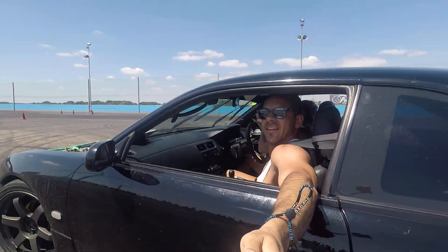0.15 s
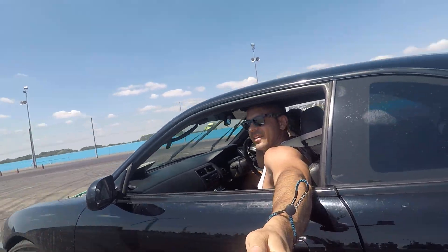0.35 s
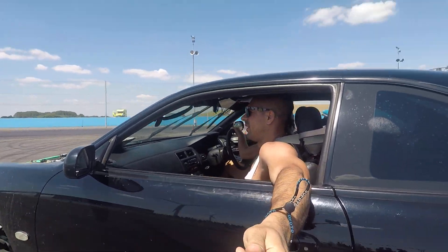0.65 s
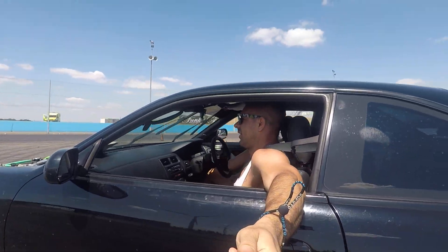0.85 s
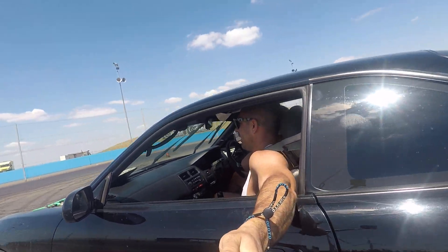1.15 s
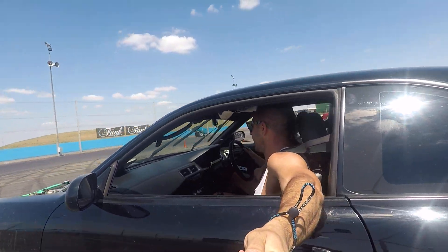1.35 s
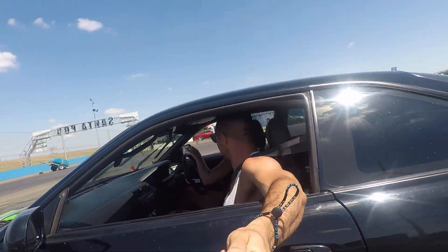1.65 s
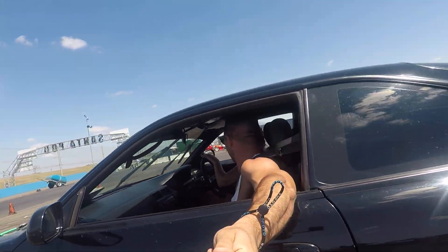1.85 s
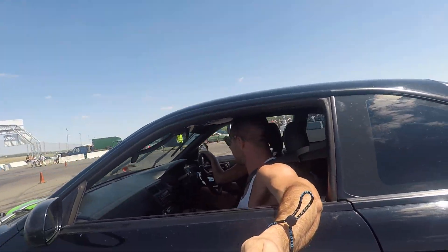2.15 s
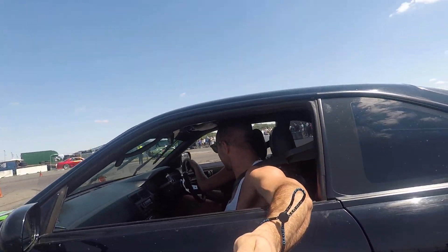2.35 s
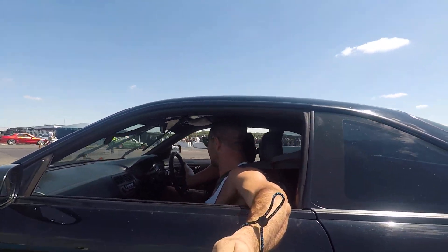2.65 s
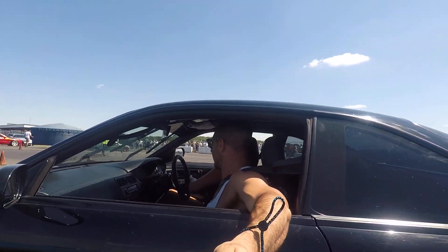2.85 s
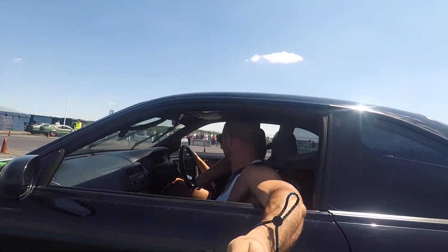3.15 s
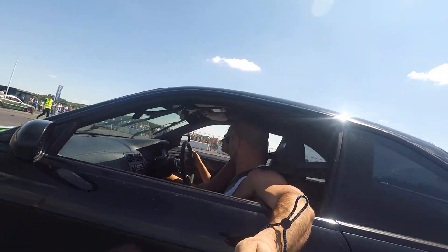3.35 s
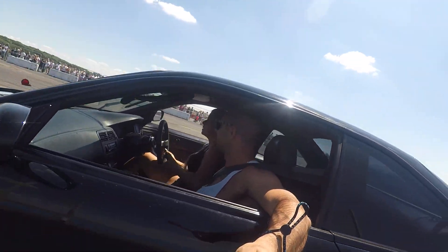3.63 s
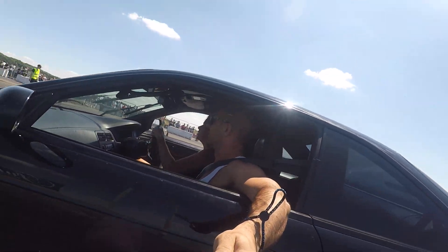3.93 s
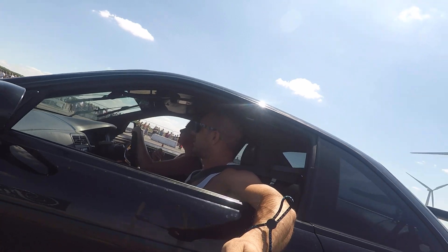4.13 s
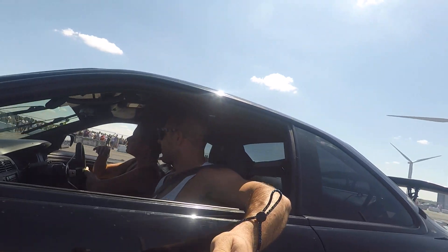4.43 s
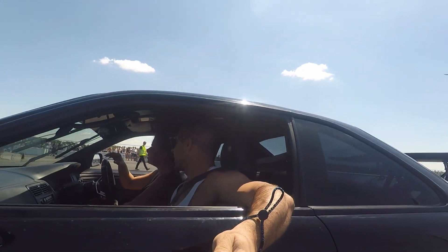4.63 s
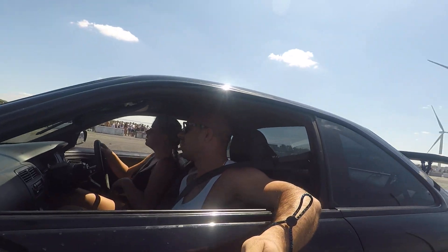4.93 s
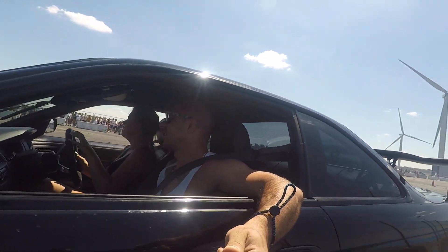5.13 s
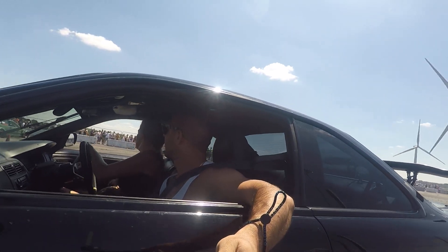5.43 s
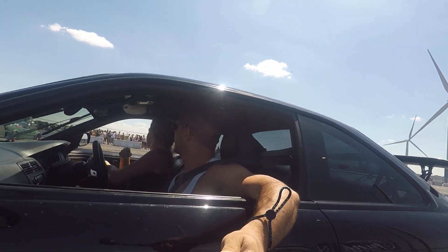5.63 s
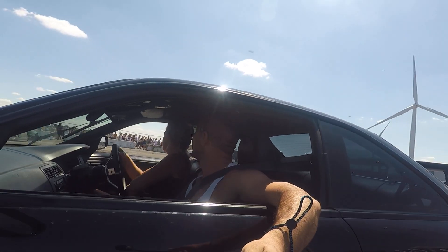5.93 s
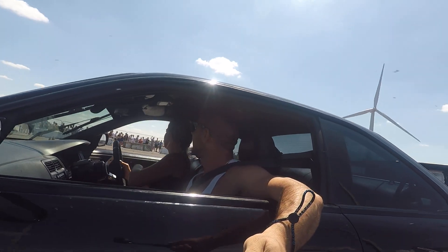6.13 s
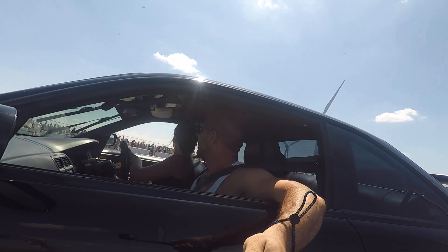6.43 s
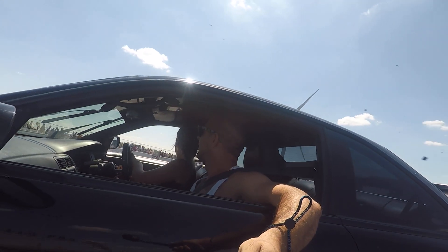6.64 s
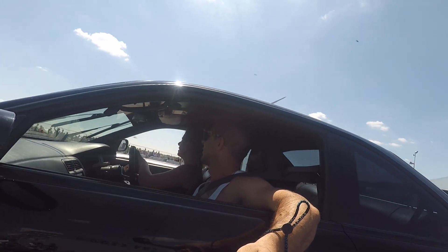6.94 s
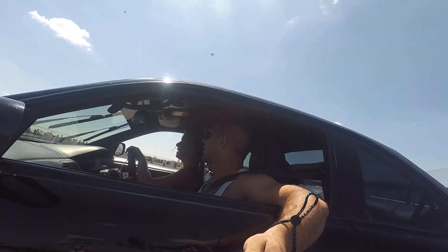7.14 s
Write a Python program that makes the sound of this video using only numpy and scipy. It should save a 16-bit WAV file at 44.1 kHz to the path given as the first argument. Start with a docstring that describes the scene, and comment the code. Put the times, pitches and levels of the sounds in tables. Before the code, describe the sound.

A car drifts on asphalt, heard close up from beside its open window. The tyres hold one high, rough screech while the four-cylinder engine revs up and down, then stays high. After about four seconds the tyres grip and the screech stops. The exhaust boom sinks with a faint gear whine and a brake chirp. A loose panel taps as rushing wind and low rumble build.

```python
"""Tyres screech for four seconds over a revving engine: a four-cylinder car drifts, heard at the window.
The tread sticks and slips on the asphalt, then grips. The exhaust booms at the firing rate as the revs
sink, gears whine, the turbo vents, a brake disc chirps and a loose panel rattles.
Rushing air and a low rumble build as the car pulls away."""
import sys
import numpy as np
from scipy import signal
from scipy.fft import rfft, irfft, next_fast_len
from scipy.io import wavfile
from scipy.ndimage import uniform_filter1d, minimum_filter1d

SR = 44100
rng = np.random.default_rng(int(sys.argv[2]) if len(sys.argv) > 2 else 0)


def digitize_waveform(pressure):
    """Quantize a signal to 16-bit integers and store it at the path in sys.argv[1].

    Rows of a 2-D input are taken as channels; values are limited to [-1, 1].
    """
    field = np.atleast_2d(pressure).T
    bounded = np.clip(field, -1, 1)
    quanta = np.round(bounded * 32767).astype(np.int16)
    wavfile.write(sys.argv[1], SR, quanta)


N = 321048
T_S = np.arange(N) / SR

# engine firing rate, also drives wheelspin: t/s, f/Hz
FIRING_HZ = [(0, 145.4), (.07, 144.3), (.22, 114), (.34, 128.7), (.52, 129.1), (.58, 116.7), (.85, 136.2),
             (1.21, 173.9), (1.42, 155.1), (1.7, 166.2), (1.9, 164.6), (2.05, 171.7), (3.52, 163.1),
             (3.62, 152.6), (3.88, 111.8), (4, 101.7), (4.17, 95), (4.42, 98.6), (4.7, 94.6), (5.35, 84.7),
             (5.75, 63), (6.42, 37.5), (6.9, 43.66), (7.28, 45.66)]
# pedal: t/s, opening/0-1
PEDAL = [(.1, 0.57), (.4, 0.95), (1.22, 0.99), (1.45, 0.7), (1.78, 0.5), (1.98, 0.32), (3.5, 0.1),
         (3.7, 0.04), (5.75, 0.25), (6, .3)]
# treble of the slide: t/s, relative level/dB
TREBLE_DB = [(0.06, -34.5), (0.48, -33), (0.53, -36.5), (1.32, -31.5), (1.35, -37.5), (1.72, -31.5),
             (1.83, -32.5), (3.29, -30), (3.85, -36)]
# low rumble level: t/s, relative level/dB
RUMBLE_DB = [(0, -1), (1.8, 2.5), (3.4, -1), (4.1, -7), (5.55, -6), (5.8, -1), (6.25, -2.5), (6.9, 2),
             (7.28, 8)]
TOP_HZ, GRIP_HZ = 170.2, 110.55   # firing rates at full wheelspin and near grip
SLIDE_START_S, BITE_S = 0.052, 0.27


def from_db(db):
    """Decibels to gain."""
    return 10 ** (np.asarray(db) / 20)


def unit_rms(x):
    """Scale to unit power."""
    return x / np.sqrt(np.mean(np.abs(x) ** 2) + 1e-20)


def curve(rows):
    """(t/s, value) points interpolated to every sample."""
    return np.interp(T_S, *np.transpose(rows))


def held(start_s, end_s, attack_s, release_s):
    """Unit gain from start to end; fade times outside are per 20 dB."""
    outside = np.maximum(start_s - T_S, 0) / attack_s + np.maximum(T_S - end_s, 0) / release_s
    return from_db(-20 * np.minimum(outside, 10))


def bump(centre_s, half_s):
    """Gaussian envelope, 1/e at +-half_s."""
    return np.exp(-((T_S - centre_s) / half_s) ** 2)


def butter(x, order, hz, kind="low"):
    """Butterworth filter."""
    return signal.sosfilt(signal.butter(order, hz, kind, fs=SR, output="sos"), x)


def coloured(x, spectrum):
    """Shape by (f/Hz, level/dB) points with 12 dB/oct skirts; unit power."""
    hz, db = np.transpose(spectrum)
    size = next_fast_len(N)
    bins_hz = np.maximum(np.fft.rfftfreq(size, 1 / SR), 1)
    skirts = np.minimum(1, np.minimum(bins_hz / hz[0], hz[-1] / bins_hz)) ** 2
    gain = from_db(np.interp(np.log(bins_hz), np.log(hz), db))
    return unit_rms(irfft(rfft(x, size) * skirts * gain, size)[:N])


def noise(spectrum):
    """Steady coloured noise; unit power."""
    return coloured(rng.standard_normal(N), spectrum)


def drift(hz):
    """Random motion up to hz; unit spread."""
    lowpass = signal.butter(2, min(hz, SR / 50), fs=SR / 20, output="sos")
    slow = signal.sosfilt(lowpass, rng.standard_normal(N // 20 + 2002))[2000:]
    return np.interp(np.arange(N) / 20, np.arange(len(slow)), unit_rms(slow))


def phase_of(hz):
    """Phase/rad of a moving frequency."""
    return 2 * np.pi * np.cumsum(hz) / SR


def ragged_tone(phase, width_hz):
    """Tone with wandering amplitude and phase; unit power."""
    return unit_rms(drift(width_hz / 2) * np.cos(phase) + drift(width_hz / 2) * np.sin(phase))


def squeaks(rows, waver, waver_hz):
    """Short friction tones that swell, glide and fade."""
    out = np.zeros(N)
    wobble = 1 + waver * drift(waver_hz)
    for start_s, length_s, first_hz, last_hz, db in rows:
        on = (T_S > start_s) & (T_S < start_s + length_s)
        progress = (T_S[on] - start_s) / length_s
        hz = (first_hz + (last_hz - first_hz) * progress) * wobble[on]
        out[on] += from_db(db) * np.sqrt(2) * np.sin(np.pi * progress) * np.sin(phase_of(hz))
    return out


def wheelspin():
    """Tread slip: 0 near grip, 1 at TOP_HZ."""
    return np.maximum(curve(FIRING_HZ) - GRIP_HZ, 0) / (TOP_HZ - GRIP_HZ)


def engine():
    """Four firings a cycle: boom at the firing rate, its octave, throb from unequal cylinders, growl."""
    # pedal lifts and stumbles that choke the boom: t/s, half width/s, depth/dB
    lifts = [(.53, 0.023, 15), (1.334, 0.096, 12), (4.506, 0.035, 3), (4.666, 0.0054, 13),
             (6.17, 0.072, 5.5), (6.42, 0.069, 8)]
    # exhaust boom, throttle shut: firing rate/Hz, level/dB
    shut_boom = [(40, -27.5), (52, -26), (66, -10), (76, -8.5), (100, -9.5), (130, -16), (170, -22.5)]
    knee_hz, open_db_per_oct = 88, 11.5   # open throttle carries the boom above the resonance
    lug_hz, lug_db_per_hz = 52.22, 1.7   # the octave takes over at low revs
    firing_hz, throttle = curve(FIRING_HZ), curve(PEDAL)
    revs_oct = np.log2(firing_hz / TOP_HZ)
    lift_db = sum(db * bump(at_s, half_s) for at_s, half_s, db in lifts)
    phase = phase_of(firing_hz * (1 + 0.0033 * drift(23.7)))
    boom_db = np.interp(firing_hz, *np.transpose(shut_boom))
    boom_db += open_db_per_oct * throttle * np.maximum(np.log2(firing_hz / knee_hz), 0)
    boom = from_db(boom_db - lift_db + (1 + wheelspin()) * drift(25)) * np.sin(phase)
    # lumpy firing at low revs: the silencer passes the orders beside the octave
    lumps = butter(ragged_tone(1.5 * phase, 7.9) + ragged_tone(3 * phase, 5), order=4, hz=140)
    lug_db = np.maximum(-13.5 - lug_db_per_hz * np.maximum(firing_hz - lug_hz, 0), -45.5)
    octave = from_db(lug_db - lift_db + drift(30)) * (np.sin(2 * phase) + from_db(-14) * lumps)
    throb_db = -22 + 46 * revs_oct + 2 * drift(21)
    throb = np.sin(phase / 2) + from_db(-5.5 + 2 * drift(5.9)) * np.sin(0.75 * phase)
    lows = np.sqrt(2) * (boom + octave + from_db(throb_db) * throb)
    return lows + exhaust_growl(phase, revs_oct, throttle, lift_db)


def exhaust_growl(phase, revs_oct, throttle, lift_db):
    """Upper orders rasp and bark: clean at high revs, puffs of gas at low revs and in a lift."""
    # pipe rasp spectrum: f/Hz, level/dB
    rasp = [(200, -23.5), (260, -12.5), (330, -14), (420, -8), (510, -7), (590, -2), (670, 0), (780, -5.5),
            (1200, -36.5)]
    # exhaust bark spectrum: f/Hz, level/dB
    bark = [(200, -2.5), (260, 1.5), (340, -20), (425, 1.5), (510, -2.5), (600, -8), (750, -30)]
    crank = phase / 2
    pulses = sum(from_db(-3 * (k % 2) + 2 * drift(13)) * np.sin(k * crank + rng.uniform(0, 2 * np.pi))
                 for k in range(3, 17))
    puffs = rng.standard_normal(N) * (1 + np.sin(crank)) ** 2
    puff_share = np.clip(0.1 - 0.36 * revs_oct + 0.06 * lift_db, 0, 1)
    rasp_db = np.maximum(-41 + 22.5 * revs_oct + 9.5 * throttle + 0.35 * lift_db, -52)
    bark_db = -27.5 + 61 * revs_oct - 30.5 * (1 - throttle)
    return sum(from_db(db) * (np.sqrt(1 - puff_share) * coloured(pulses, spectrum)
                              + np.sqrt(puff_share) * coloured(puffs, spectrum))
               for db, spectrum in [(rasp_db, rasp), (bark_db, bark)])


def tyre_squeal(judder):
    """Tread sticks and slips near 1 kHz; spin and throttle smear the note and its overtones."""
    # stick-slip rate: t/s, f/Hz
    slip_hz = [(0, 1088), (.045, 985), (.12, 991.8), (.3, 968), (.47, 1020), (.56, 946), (.64, 950.5),
               (.88, 1060), (1.17, 1098), (1.42, 1058), (1.88, 1063), (2.35, 1067), (2.66, 1094),
               (3.1, 1069), (3.3, 1044), (3.54, 1064), (3.8, 960), (4.05, 951)]
    # other tyres squealing near the note: pitch ratio, width/Hz, relative level/dB
    other_tyres = [(1, 84, -5), (1.105, 70, -8), (.89, 85, -14.5)]
    # harmonics from the second up: width/Hz, relative level/dB
    harmonics = [(280, 3.5), (219, -6.5), (330, -13)]
    # groans as a tyre bites: t/s, length/s, start f/Hz, end f/Hz, level/dB
    groans = [(.02, 0.048, 760, 700, -24), (.1, 0.054, 747, 714, -31.5), (.42, 0.08, 720, 705, -31),
              (.51, 0.057, 686, 713, -29), (3.51, 0.11, 760, 790, -26.5), (3.6, 0.097, 727, 670, -31),
              (3.7, 0.08, 731.5, 699, -31.5), (3.77, 0.12, 695, 643, -35.5)]
    end_s, release_s, lead_s = 4.0, 0.076, 0.071   # each higher harmonic ends lead_s sooner
    spin, throttle = wheelspin(), curve(PEDAL)
    ragged = 0.462 + 0.42 * spin + 0.26 * throttle
    jitter = 0.00898 * drift(18) + 0.00699 * drift(45) + 0.013 * drift(149)
    phase = phase_of(curve(slip_hz) * (1 + ragged * jitter))
    note = np.sqrt(2) * np.sin(phase) * from_db(drift(58))
    beside = sum(from_db(db) * ragged_tone(ratio * phase, width_hz) for ratio, width_hz, db in other_tyres)
    sliding = held(SLIDE_START_S, end_s, BITE_S, release_s)
    screech = sliding * (note + ragged * beside) / np.sqrt(1 + 0.5 * ragged ** 2)
    # slips are cleanest and sharpest at low wheelspin
    clean = np.maximum(1.05 - 0.87 * spin, 0)
    tilt_db = 2.5 - 2 * spin
    overtones = 0
    for k, (width_hz, db) in enumerate(harmonics, 2):
        gate = held(SLIDE_START_S, end_s - (k - 1) * lead_s, BITE_S, release_s)
        tone = ragged * ragged_tone(k * phase, width_hz) + clean * np.sin(k * phase)
        overtones += from_db(db + (k - 1) * tilt_db) * gate * tone
    swing_db = curve(TREBLE_DB) + 32
    overtones_db = -25 - 6.5 * spin - 1.5 * throttle + swing_db + 2 * judder
    squeal = from_db(-13) * screech + from_db(overtones_db) * overtones
    return squeal + squeaks(groans, waver=0.047, waver_hz=120)


def tyre_scrub(judder):
    """Rubber tears on the asphalt in grains until the slide ends."""
    # tearing spectrum: f/Hz, level/dB
    tearing = [(760, -9.5), (1300, 4), (1450, -3), (1750, -5), (2400, -3.5), (3100, -9.5), (3600, -10),
               (4300, -10), (5100, -18), (6800, -18), (8500, -30), (10000, -39.5), (11500, -50.5),
               (15000, -78)]
    sliding = held(SLIDE_START_S, end_s=3.8, attack_s=BITE_S, release_s=0.46)
    grain_db = 1.2 * judder + 0.7 * drift(27) + 1.2 * drift(190)
    return sliding * from_db(curve(TREBLE_DB) + 6.5 + grain_db) * noise(tearing)


def ground_dip(x, dip_hz, width_hz, depth):
    """The bounce off the asphalt cancels a band of the tyres' treble."""
    notched = signal.lfilter(*signal.iirnotch(dip_hz, dip_hz / width_hz, fs=SR), x)
    return x + depth * (notched - x)


def air_rush():
    """Air rushes past the microphone, beats on its housing and scuffs it in gusts."""
    # rush: t/s, relative level/dB
    rush_db = [(0, -58.5), (3.9, -51), (4.5, -49.5), (5.45, -49.5), (5.72, -53), (6.4, -47), (6.8, -42.5),
               (7.28, -43)]
    # rush spectrum: f/Hz, level/dB
    rush_spectrum = [(880, -24.5), (1500, -1), (2200, -6), (3200, -8), (4500, -10), (6300, -16),
                     (7200, -20), (10000, -32), (11500, -58), (15000, -78.5)]
    # housing flutter spectrum: f/Hz, level/dB
    flutter_spectrum = [(80, -51.5), (140, -5), (195, 2), (230, -2.5), (280, -19), (400, -62.5)]
    # gusts: t/s, half width/s, relative level/dB
    gusts = [(6.4, 0.015, -37), (6.526, 0.02, -40), (6.646, 0.019, -30), (6.702, .014, -38.5),
             (6.804, 0.018, -32), (6.871, 0.019, -29.5), (6.937, 0.026, -35.5), (7.02, .02, -37),
             (7.118, 0.013, -43)]
    # gust spectrum: f/Hz, level/dB
    gust_spectrum = [(150, -11), (400, -2), (1000, 3.5), (1700, -3.5), (3300, -6), (4600, -10.5),
                     (7000, -19.5), (10000, -41), (12000, -61)]
    rush = from_db(curve(rush_db) + 3.5 + 1.9 * drift(60)) * noise(rush_spectrum)
    flutter = from_db(-29.5 + 1.6 * curve(RUMBLE_DB)) * noise(flutter_spectrum)
    gust_gain = sum(from_db(db) * bump(at_s, half_s) for at_s, half_s, db in gusts)
    scuffs = gust_gain * from_db(2 + 2.7 * drift(250)) * noise(gust_spectrum)
    return rush + flutter + scuffs


def road_roar():
    """Tyres roll on the asphalt with a flickering roar."""
    # roar: t/s, relative level/dB
    roar_db = [(0, -41.5), (3.6, -48), (4.1, -36), (4.4, -40.5), (4.7, -35.5), (5.35, -41), (5.7, -43),
               (6.35, -41), (6.85, -36.5)]
    # roar spectrum: f/Hz, level/dB
    spectrum = [(150, -11), (250, -2.5), (409, -3), (446, -5), (708, -8.5), (973, -7.5), (1100, -9),
                (2500, -35), (3250, -32), (5500, -120)]
    return from_db(curve(roar_db) + 3 + 1.6 * drift(29)) * noise(spectrum)


def low_rumble():
    """Low rumble of wind and lumpy low-rev engine, with two low buffets."""
    # rumble spectrum: f/Hz, level/dB
    spectrum = [(15, -14.5), (28, -0.5), (42, 5.5), (75, 5), (120, 13), (170, 1.5), (230, -24.5),
                (280, -34), (400, -51)]
    # buffets: t/s, f/Hz, level/dB
    buffets = [(4.449, 50, -11), (4.722, 62.6, -9)]
    rumble = from_db(-21.5 + curve(RUMBLE_DB) + 1.2 * drift(2.7)) * noise(spectrum)
    return rumble + sum(from_db(db) * bump(at_s, half_s=0.02) * np.sin(2 * np.pi * hz * (T_S - at_s))
                        for at_s, hz, db in buffets)


def brake():
    """The disc chirps as the pad catches and sings faintly while pressed."""
    # pad catches: t/s, length/s, start f/Hz, end f/Hz, level/dB
    chirps = [(.28, 0.1, 6560, 6720, -40), (3.14, 0.085, 6540, 6750, -36), (3.76, 0.044, 6840, 6780, -43),
              (4.28, 0.038, 6730, 6620, -36), (4.4, 0.063, 6670, 6590, -28.5)]
    # pad pressed: start/s, end/s, level/dB
    presses = [(4.204, 4.9, -61.5), (5.1, 5.704, -65.5), (6.8, 7.097, -55)]
    disc_hz = 6640.0
    pressed = sum(from_db(db) * held(start_s, end_s, attack_s=0.4, release_s=0.4)
                  for start_s, end_s, db in presses)
    singing = from_db(1.1 * drift(9.7)) * ragged_tone(phase_of(np.full(N, disc_hz)), width_hz=50)
    return pressed * singing + squeaks(chirps, waver=0.012, waver_hz=400)


def turbo_vent():
    """Off throttle the turbo sheds boost in quick sighs."""
    # vent hiss spectrum: f/Hz, level/dB
    hiss = [(4000, -23), (6500, -2), (8200, -9), (9500, -16), (11000, -35.5), (14000, -55)]
    sigh_hz = 12
    gate = held(start_s=4, end_s=4.59, attack_s=0.45, release_s=0.37)
    return gate * from_db(-52 + 3.1 * np.sin(2 * np.pi * sigh_hz * T_S)) * noise(hiss)


def gear_whine():
    """Gears whine downwards on the overrun."""
    start_s, start_hz, sag_oct_per_s = 4.15, 450, 0.56
    gear_hz = start_hz * 2 ** (-sag_oct_per_s * (T_S - start_s))
    gate = held(start_s, end_s=6.0, attack_s=0.18, release_s=0.24)
    return from_db(-44) * gate * ragged_tone(phase_of(gear_hz), width_hz=21)


def panel_rattle():
    """Brief gritty contacts tap a loose panel: a dry crack, then a short ring."""
    # contacts: t/s, relative level/dB
    taps = [(5.781, -34.5), (6.229, -16), (6.315, -40), (6.351, -25.5), (6.444, -27), (6.633, -26),
            (6.785, -22.5), (6.858, -26)]
    # panel modes: f/Hz, relative level/dB, t60/s
    modes = [(1370, -7, 0.021), (1950, -6, 0.014), (2540, -3, .021), (3160, -7.5, 0.015),
             (4020, -5.5, .016), (4102, -17, .012)]
    contact_s = 0.0019
    envelope = sum(from_db(db - 18.5) * (T_S > at_s) * np.exp(-np.abs(T_S - at_s) / contact_s)
                   for at_s, db in taps)
    force = butter(envelope * rng.standard_normal(N) + 1e-18, order=4, hz=5500)
    ring = 0
    for k, (hz, db, t60_s) in enumerate(modes):
        radius, angle = from_db(-60 / (t60_s * SR)), 2 * np.pi * hz / SR
        mode = signal.lfilter([np.sin(angle)], [1, -2 * radius * np.cos(angle), radius ** 2], force)
        ring += (-1) ** k * from_db(db) * mode
    crack = butter(force, order=2, hz=[1100, 4500], kind="band")
    return ring + from_db(8) * crack


def scene():
    """All sources at one microphone beside the door."""
    judder = drift(30)   # asphalt bumps vary the load on the tread
    slide = ground_dip(tyre_squeal(judder) + tyre_scrub(judder), dip_hz=2703, width_hz=200, depth=0.91)
    drivetrain = engine() + gear_whine() + turbo_vent()
    return (drivetrain + slide + air_rush() + road_roar() + low_rumble() + brake() + panel_rattle())[None]


def record(dry):
    """Fast peak limiter, then a steep low-pass."""
    ceiling, window_samples, cutoff_hz = 0.92, 401, 14500
    needed = ceiling / np.maximum(np.abs(dry), ceiling)
    gain = uniform_filter1d(minimum_filter1d(needed, window_samples), window_samples)
    return signal.sosfilt(signal.cheby2(12, 70, cutoff_hz, fs=SR, output="sos"), gain * dry)


dry = scene()
out = record(dry)
digitize_waveform(out)
```